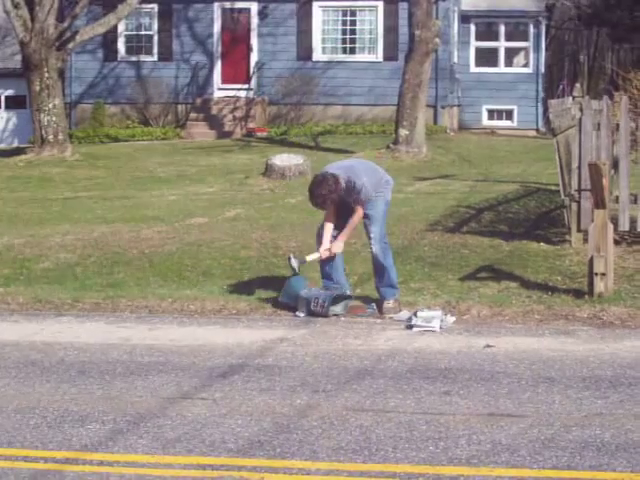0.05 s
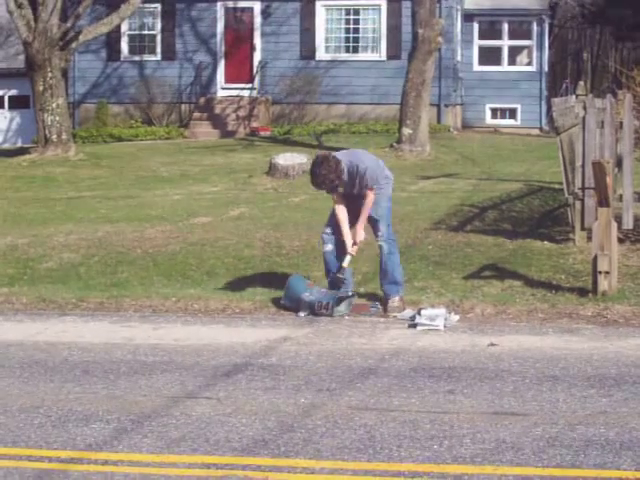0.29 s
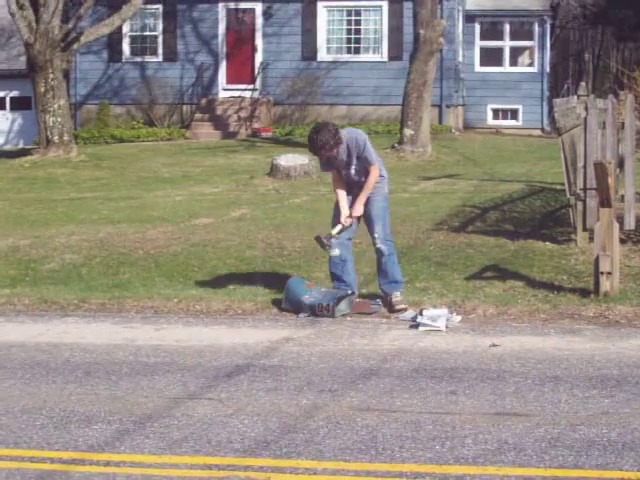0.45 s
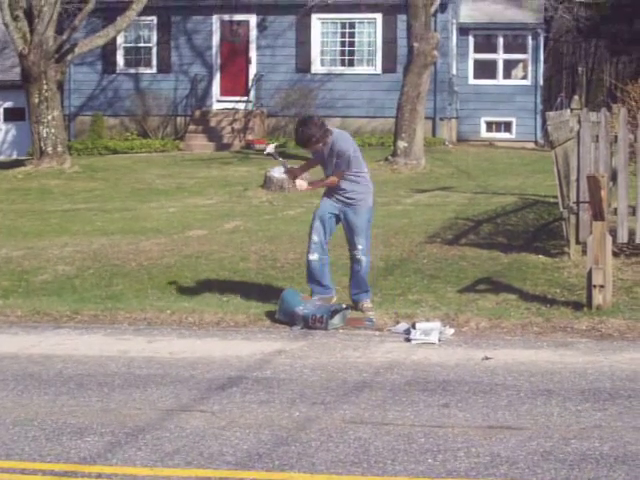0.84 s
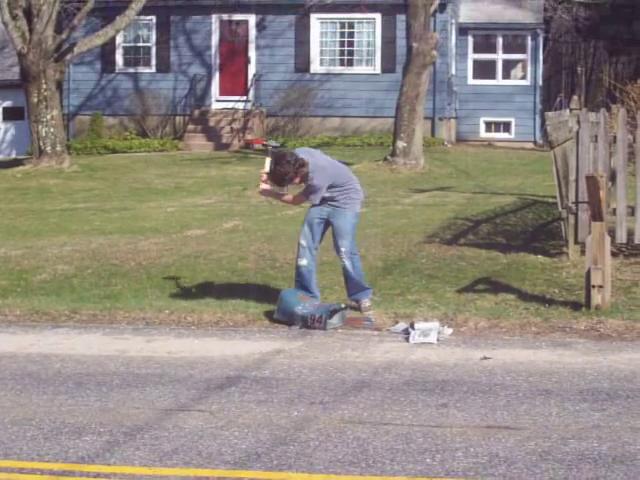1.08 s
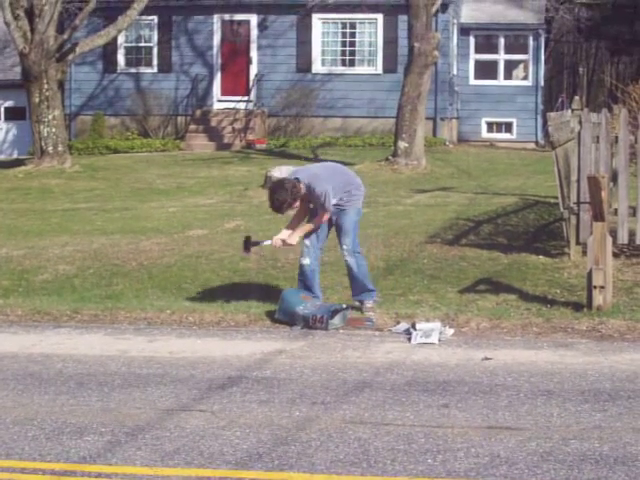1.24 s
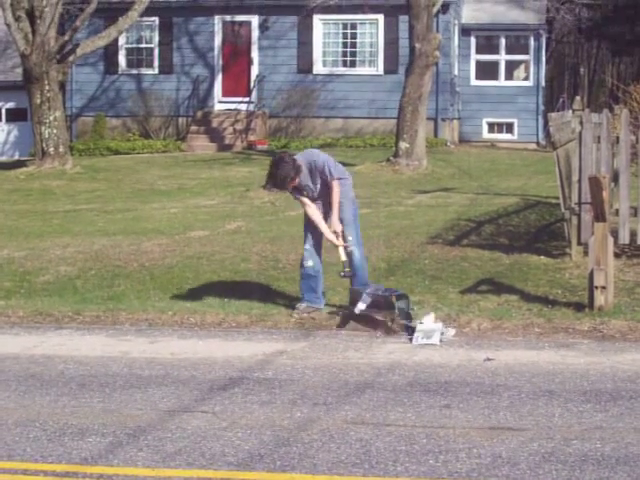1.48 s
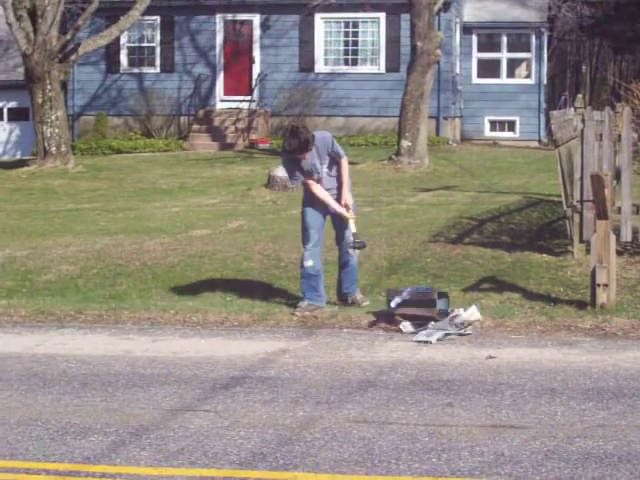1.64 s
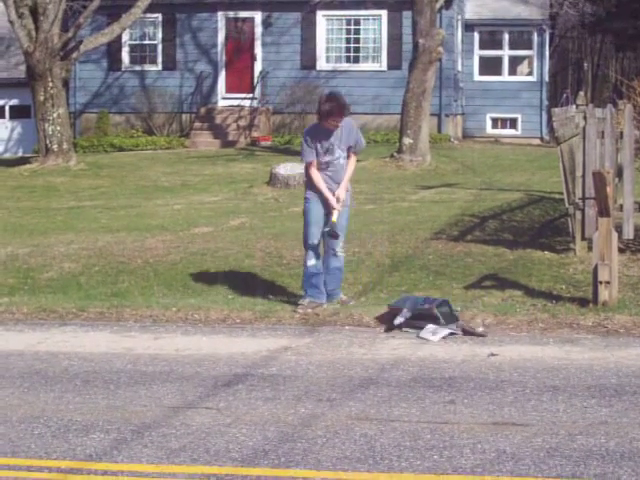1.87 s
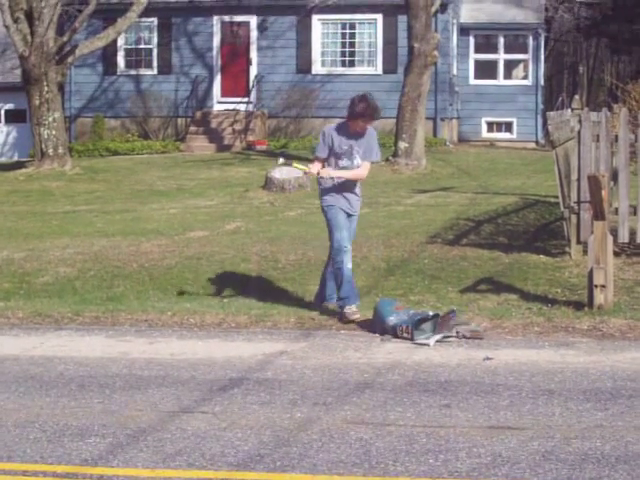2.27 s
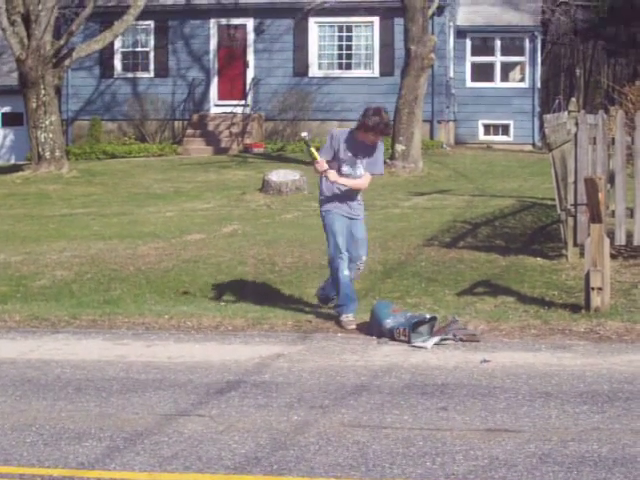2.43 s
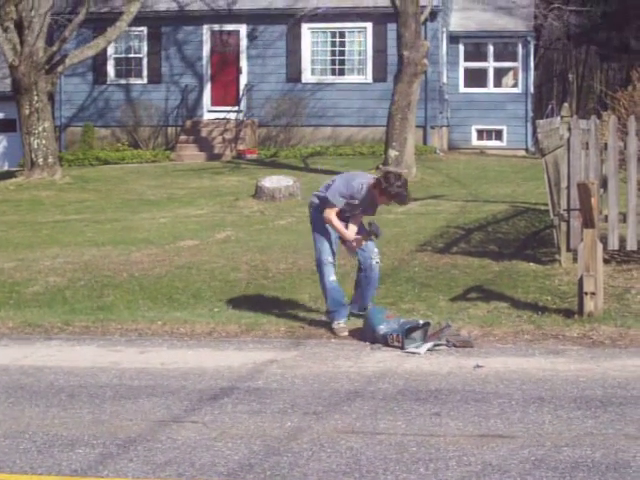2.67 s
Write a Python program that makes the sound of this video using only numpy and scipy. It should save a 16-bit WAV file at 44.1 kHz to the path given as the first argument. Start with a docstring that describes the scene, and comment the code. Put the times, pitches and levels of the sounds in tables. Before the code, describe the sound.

A hammer smashes a sheet-metal mailbox on a lawn, followed by scrapes and clinks. A second blow sends it skidding and clattering to rest. Heard from across the road, with a slight echo and faint distant traffic.

```python
"""Hammer blows on a mailbox

A hammer twice hits a sheet-metal mailbox lying on a lawn, heard from across the road. The sheet
buckles in bursts of noise; impacts and friction excite its modes as it rattles, skids and tumbles
to rest. House fronts and trees echo it, distant traffic murmurs, and both blows overload and clip."""
import sys
import numpy as np
from scipy import signal
from scipy.fft import rfft, irfft
from scipy.io import wavfile
from scipy.ndimage import uniform_filter1d

SR = 44100
rng = np.random.default_rng(int(sys.argv[2]) if len(sys.argv) > 2 else 0)


def put_to_file(sound):
    """Save the sound as 16-bit audio at rate SR, in the file named by the first command-line argument."""
    columns = np.atleast_2d(sound).T  # one column per channel
    safe = np.clip(columns, -1, 1)
    whole_steps = np.round(safe * 32767)
    wavfile.write(sys.argv[1], SR, whole_steps.astype(np.int16))


N = 123479

# hammer blows: (time [s], crumpling time [s], thump [dB], hollow crunch [dB], crack [dB])
BLOWS = [(0.2116, 0.019, 2.5, -2, -13), (1.4346, 0.0078, 6.5, -5, -6.5)]
# spectra of the hollow crunch and of the crack: (frequency [Hz], gain [dB])
HOLLOW_SPECTRUM = [(150, -27.5), (330, -13), (460, -3), (560, 1.5), (640, -3.5), (760, -3), (900, -0.5),
                   (1050, -8.5), (1250, -28), (2500, -44)]
CRACK_SPECTRUM = [(100, -8), (300, 6), (1000, 3), (1400, -9), (1900, -0.5), (2550, 9.5), (3000, -5),
                  (3600, 8.5), (4600, -6), (5100, 4.5), (6500, -17)]
# knocks: (time [s], contact time [s], thud [dB], body [dB], clank [dB], panel resonance [Hz])
KNOCKS = [(.030, 0.016, -37.5, -37, -45, 980), (.081, 0.014, -52, -35.5, -40, 2350),
          (.32, 0.028, -25.5, -29.5, -45, 520), (.398, .012, -29.5, -27, -46.5, 836),
          (.431, 0.0029, -22.5, -26.5, -52.5, 191), (.439, 0.0098, -17, -20.5, -39.5, 487),
          (.477, 0.0036, -20.5, -26.5, -46.5, 524), (.6555, .013, -38, -29.5, -27, 6100),
          (.75, 0.01, -45, -38.5, -45, 5600), (.8325, 0.0088, -53, -39, -26, 4090),
          (.935, 0.016, -57, -37, -46.5, 2520), (1.08, 0.019, -73, -42, -48.5, 4200),
          (1.46, 0.0065, -20.5, -20, -30, 900), (1.537, .025, -29, -27, -27, 614),
          (1.615, 0.016, -45.5, -31.5, -28, 5500), (1.705, 0.011, -30.5, -22, -28, 570),
          (1.741, 0.02, -23, -24.5, -24.5, 5300), (1.925, 0.0065, -22.5, -23.5, -24, 4200),
          (1.987, 0.003, -27, -20, -27.5, 676), (2.064, 0.0036, -14, -22, -35.5, 183),
          (2.08, 0.0074, -24.5, -30, -36.5, 5300), (2.128, 0.001, -23, -30, -45, 3160),
          (2.217, 0.0069, -36.5, -45, -39.5, 2300), (2.238, 0.0036, -15.5, -16, -26, 227),
          (2.303, 0.008, -23.5, -15, -22.5, 994), (2.337, 0.0076, -28, -17.5, -34, 526),
          (2.413, 0.0042, -28, -48, -42, 400), (2.465, 0.012, -28, -39, -47, 383)]
# strongest modes of the box: (frequency [Hz], relative level [dB], 60 dB decay time [s])
STRONG_MODES = [(165, -20, 0.25), (203, 12, .13), (259, 7.5, 0.24), (525.7, 1, 0.48), (570.3, -7, 0.2),
                (860.2, 8.5, 0.17), (920, -2.5, 0.12), (1022, -26, 0.19), (1055, 9.5, 0.067),
                (2354, 8.5, 0.12), (2530, -10.5, 0.047), (3610, 8.5, 0.056), (4200, 7, 0.11),
                (5110, -3, 0.2)]
# weighting of the lesser panel modes: (frequency [Hz], relative level [dB])
PANEL_SPECTRUM = [(90, -23), (135, -14.5), (200, 18.5), (300, -14.5), (420, -3.5), (590, 16), (730, -1),
                  (900, 8), (1080, 4.5), (1280, -20.5), (1600, -12.5), (1900, 0), (2400, 5), (3000, -5.5),
                  (3700, -2.5), (4200, 0), (4800, -5.5), (5600, -2), (6500, -15.5)]
# the box skidding over grass and grit: (time [s], level [dB], clank gain [dB])
SKID = [(1.44, -25, 10), (1.47, -36, -27.5), (1.51, -24.5, -7.5), (1.56, -27, -13.5), (1.60, -25.5, -11),
        (1.68, -29, 0), (1.77, -24.5, -8), (1.83, -29.5, -10), (1.89, -36, -1), (1.96, -28, -9.5),
        (2.04, -29.5, -12), (2.11, -33.5, -11.5), (2.19, -48, -1.5), (2.28, -25, -12.5), (2.38, -29, -15.5),
        (2.52, -45.5, -9)]
# the box scraping as the hammer is pulled free: (time [s], level [dB], clank gain [dB])
SCRAPE = [(.22, -14, -6.5), (.28, -42.5, -9.5), (.33, -29.5, -14), (.38, -32.5, -14), (.49, -32, -16),
          (.56, -37.5, -13), (.63, -38.5, -14), (.74, -43.5, -2)]
# hammer on the rim: (time [s], low ring [Hz], level [dB], bright ring [Hz], level [dB])
CLINKS = [(.656, 940, -29.5, 2510, -28), (.833, 888, -29.5, 5580, -26)]
# creaks of bent metal: (time [s], length [s], start pitch [Hz], end pitch [Hz], level [dB])
CREAKS = [(0.294, 0.024, 1977, 1474, -38), (0.315, 0.028, 1780, 1430, -35), (0.355, .028, 2035, 1357, -38)]
# scatter from lawn, fence and trees: (frequency [Hz], gain [dB])
SCATTER_SPECTRUM = [(100, -28.5), (200, -14.5), (550, -17), (900, -20.5), (1500, -7), (2500, -13.5),
                    (6000, -24)]
# echoes from house fronts: (delay [s], spread [s], level before colouring [dB])
HOUSE_ECHOES = [(.108, 0.024, -23), (.226, 0.034, -26.5)]
# colouring of those echoes: (frequency [Hz], gain [dB])
ECHO_SPECTRUM = [(100, 7), (200, 13.5), (500, -3.5), (900, -3.5), (1500, -17), (6000, -21.5)]
# outdoor rumble: (frequency [Hz], relative spectral density [dB])
RUMBLE_SPECTRUM = [(15, -47), (25, -15), (91, 0), (129, -6), (167, 9), (259, -3), (349, -1.5), (785, -11),
                   (989, -15), (1280, -27.5), (2270, -27.5), (5470, -34), (6290, -39), (8180, -70),
                   (13800, -120)]
# swell of the distant drone: (time [s], level [dB])
DRONE_SWELL = [(0, -42), (.8, -42.5), (.95, -34.5), (1.15, -36.5), (1.3, -35.5), (1.85, -36.5), (2.05, -25),
               (2.17, -30.5), (2.36, -32), (2.53, -23), (2.65, -37.5), (2.8, -30.5)]

# the thud, body and clank registers: band edges and 60 dB decay times of their lesser modes
REGISTER_EDGES_HZ, PANEL_T60_S = [90, 400, 1350, 6700], [0.039, 0.089, 0.092]


def hammer_blows(thump_hz=200.4, thump_decay_s=0.0043, after_ring_db=-21, after_ring_s=0.016, size=8000):
    """Impact drives the box into the turf as a damped oscillator; buckling radiates unpitched noise."""
    out, t = np.zeros(N), np.arange(size) / SR
    thump = np.sin(2 * np.pi * thump_hz * t) * np.exp(-t / thump_decay_s)
    for at, length, thump_db, hollow_db, crack_db in BLOWS:
        envelope = np.maximum(buckling(t, length), undb(after_ring_db) * np.exp(-t / after_ring_s))
        hollow = burst(colour(rng.standard_normal(size), HOLLOW_SPECTRUM), envelope)
        crack = burst(colour(rng.standard_normal(size), CRACK_SPECTRUM), envelope)
        add(out, undb(thump_db) * thump + undb(hollow_db) * hollow + undb(crack_db) * crack, at)
    return out


def buckling(t, length):
    """Envelope of plastic deformation: level while the sheet yields, then falling steeply."""
    return 1 / (1 + (t / max(length, .001)) ** 8)


def box_modes(count=220, size=9000):
    """Normal modes vibrate freely as damped sines; each register has a strong and a lesser set."""
    t = np.arange(size) / SR

    def damped_sines(hz, gain, t60):
        decay = np.exp(-np.log(1000) * t / t60[:, None])
        return gain[:, None] * np.sin(2 * np.pi * hz[:, None] * t) * decay

    modes, registers = np.array(STRONG_MODES), []
    for lo, hi, t60 in zip(REGISTER_EDGES_HZ, REGISTER_EDGES_HZ[1:], PANEL_T60_S):
        strong_hz, strong_db, strong_t60 = modes[(modes[:, 0] >= lo) & (modes[:, 0] < hi)].T
        strong = damped_sines(strong_hz, undb(strong_db), strong_t60)
        lesser_hz = lo + (hi - lo) * (np.arange(count) + rng.random(count)) / count
        lesser = damped_sines(lesser_hz, gain_at(lesser_hz, PANEL_SPECTRUM), np.full(count, t60))
        registers.append((strong, lesser))
    return registers


def contact_response(strong, lesser, strong_db=-8):
    """Modal superposition: each contact point gives the modes different signs and weights."""
    def excite(modes):
        weights = rng.choice([-1, 1], len(modes)) * (.5 + rng.random(len(modes)))
        return unit(weights @ modes)

    return undb(strong_db) * excite(strong) + excite(lesser)


def knocks(registers, clicks_per_s=1900, click_db=-8, panel_db=-3, panel_q=9.5, size=2600):
    """An impulse and buckling clicks force the modes; the struck panel stresses its own resonance."""
    out, t = np.zeros(N), np.arange(size) / SR
    for at, length, *levels, panel_hz in KNOCKS:
        clicks = (rng.random(size) < clicks_per_s / SR) * rng.standard_normal(size)
        force = undb(click_db) * clicks * buckling(t, length)
        force[0] = 1  # first contact
        resonator = signal.iirpeak(panel_hz, panel_q, fs=SR)
        for register, db in zip(registers, levels):
            ring = signal.fftconvolve(contact_response(*register), force)
            ring += undb(panel_db) * signal.lfilter(*resonator, ring)
            peak_rms = np.sqrt(uniform_filter1d(ring ** 2, 441).max())  # loudest 10 ms
            add(out, undb(db) * ring / peak_rms, at)
    return out


def friction(slide, registers, spots=4, clicks_per_s=900, spread_db=4, thud_db=-3.5):
    """Sliding friction catches at several spots, each driving the modes with random impulses."""
    out, t = np.zeros(N), np.arange(N) / SR
    sliding = undb(curve(slide)) * (t > slide[0][0]) * (t < slide[-1][0])
    register_gains = [undb(thud_db), 1, undb(curve(slide, column=2))]
    for _ in range(spots):
        clicks = (rng.random(N) < clicks_per_s / spots / SR) * rng.choice([-1, 1], N)
        grit = unit(clicks * undb(spread_db * rng.standard_normal(N)))
        for register, gain in zip(registers, register_gains):
            response = contact_response(*register)
            out += signal.oaconvolve(grit * sliding * gain, response / np.linalg.norm(response))[:N]
    return out / np.sqrt(spots)


def rim_clinks(low_decay_s=0.045, bright_decay_s=0.015, relative_width=0.089, size=12000):
    """Closely spaced rim modes merge into two noise bands; damping ends the brighter one first."""
    out, t = np.zeros(N), np.arange(size) / SR
    for at, low_hz, low_db, bright_hz, bright_db in CLINKS:
        for hz, db, decay in [(low_hz, low_db, low_decay_s), (bright_hz, bright_db, bright_decay_s)]:
            cluster = band_noise(hz, hz * relative_width, size)
            add(out, undb(db) * burst(cluster, np.exp(-t / decay)), at)
    return out


def creaks(roughness_hz=125, size=4000):
    """Bent metal creaks in falling glides, which random amplitude modulation makes rough."""
    out, t = np.zeros(N), np.arange(size) / SR
    for at, length, start_hz, end_hz, db in CREAKS:
        progress = np.clip(t / length, 0, 1)
        pitch_hz = start_hz + (end_hz - start_hz) * progress
        glide = np.sqrt(2) * np.sin(2 * np.pi * np.cumsum(pitch_hz) / SR)
        add(out, undb(db) * np.sin(np.pi * progress) * glide * band_noise(0, roughness_hz, size), at)
    return out


def house_echoes():
    """Impulse response of the house fronts: each reflection arrives delayed, smeared and coloured."""
    out, t = np.zeros(N), np.arange(N) / SR
    for delay, spread, db in HOUSE_ECHOES:
        smear = rng.standard_normal(N) * np.exp(-t / spread)
        add(out, undb(db) * smear / np.linalg.norm(smear), delay)
    return colour(out, ECHO_SPECTRUM)


def yard_reverberation(source, rise_s=0.0026, t60_s=0.85):
    """Diffuse scattering gives an exponentially decaying tail, heard with the house echoes."""
    t = np.arange(N) / SR
    tail = rng.standard_normal(N) * (1 - np.exp(-t / rise_s)) * np.exp(-np.log(1000) * t / t60_s)
    response = colour(tail / np.linalg.norm(tail), SCATTER_SPECTRUM) + house_echoes()
    return signal.fftconvolve(source, response[:N // 2])[:N]


def distant_traffic(rumble_db=-37, hum_hz=95.6, hum_db=-46.5):
    """Superposition of broadband rumble, a steady hum and a narrowband drone that swells and sinks."""
    rumble = unit(colour(rng.standard_normal(N), RUMBLE_SPECTRUM))
    hum = np.sqrt(2) * np.sin(2 * np.pi * hum_hz * np.arange(N) / SR)
    drone = band_noise(hz=361, half_width_hz=103) + undb(-4.5) * band_noise(hz=187, half_width_hz=51.5)
    return undb(rumble_db) * rumble + undb(hum_db) * hum + undb(curve(DRONE_SWELL)) * drone


def band_noise(hz, half_width_hz, size=N):
    """Noise with a bell-shaped resonance spectrum, at rms 1."""
    f = np.fft.rfftfreq(size, 1 / SR)
    return unit(irfft(rfft(rng.standard_normal(size)) / (1 + ((f - hz) / half_width_hz) ** 2), size))


def burst(noise, envelope):
    """Amplitude modulation, scaled to carry the energy of the envelope."""
    return unit(noise * envelope) * np.sqrt(np.mean(envelope ** 2))


def colour(x, spectrum):
    """Linear filtering by multiplication in the frequency domain."""
    return irfft(rfft(x) * gain_at(np.fft.rfftfreq(len(x), 1 / SR), spectrum), len(x))


def gain_at(hz, spectrum):
    """Amplitude gain, interpolated in decibels over log frequency."""
    f, db = np.array(spectrum).T
    return undb(np.interp(np.log(hz + 1e-6), np.log(f), db))


def curve(rows, column=1):
    """Linear interpolation of a time table at every sample."""
    rows = np.array(rows)
    return np.interp(np.arange(N) / SR, rows[:, 0], rows[:, column])


def undb(db):
    """Amplitude ratio of a level in decibels."""
    return 10 ** (np.asarray(db) / 20)


def unit(x):
    """Normalisation to rms 1."""
    return x / np.sqrt(np.mean(x ** 2) + 1e-18)


def add(out, x, at_s):
    """Superposition of x from the given time."""
    i = int(at_s * SR)
    out[i:i + len(x)] += x[:max(N - i, 0)]


def scene(low_cut_hz=117):
    """The box, its reverberation and the traffic sum to one pressure, the same in both ears."""
    registers = box_modes()
    box = hammer_blows() + knocks(registers) + rim_clinks() + creaks()
    box = box + friction(SCRAPE, registers) + friction(SKID, registers)
    # the box sounds little below its lowest modes
    box = signal.sosfilt(signal.butter(3, low_cut_hz, "high", fs=SR, output="sos"), box)
    return np.tile(box + yard_reverberation(box) + distant_traffic(), (2, 1))


def record(dry, input_limit=.70, output_limit=.71, band_hz=6380, top_hz=15800):
    """Overload distortion: peaks clip, band limiting overshoots, and the overshoots clip again."""
    clipped = np.clip(dry, -input_limit, input_limit)
    narrow = signal.sosfiltfilt(signal.butter(16, band_hz, fs=SR, output="sos"), clipped)
    reclipped = np.clip(narrow, -output_limit, output_limit)
    return signal.sosfilt(signal.ellip(8, .2, 70, top_hz, fs=SR, output="sos"), reclipped)


dry = scene()
out = record(dry)
put_to_file(out)
```